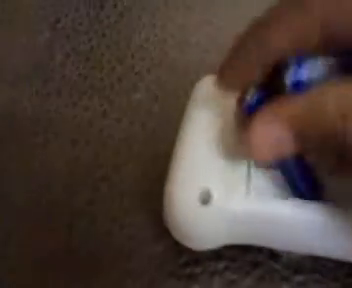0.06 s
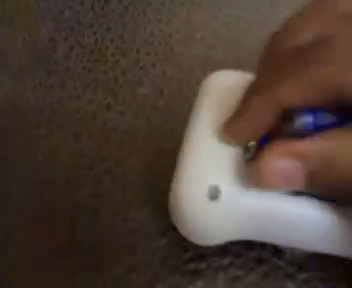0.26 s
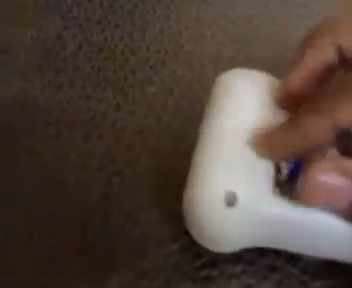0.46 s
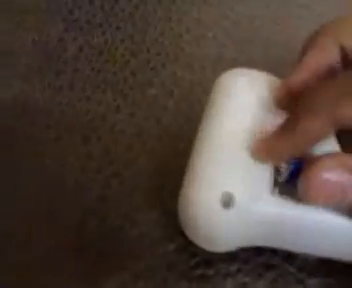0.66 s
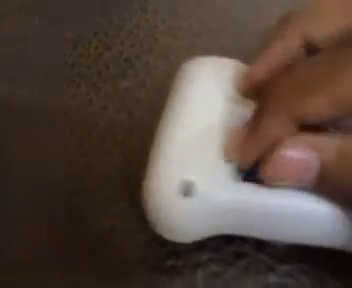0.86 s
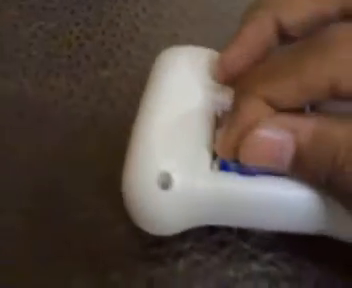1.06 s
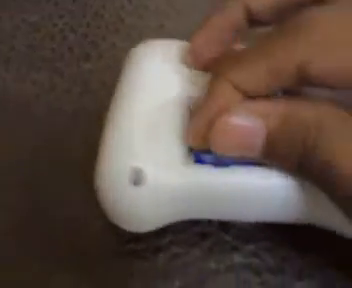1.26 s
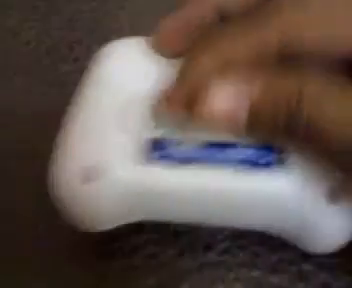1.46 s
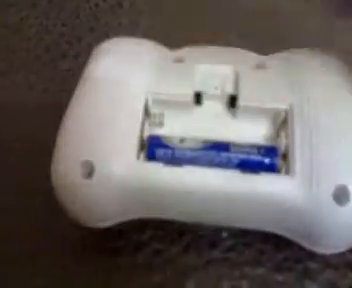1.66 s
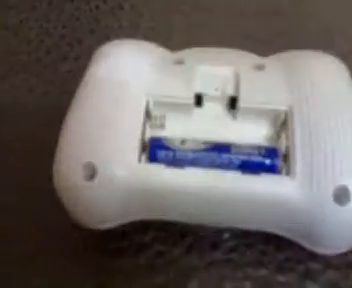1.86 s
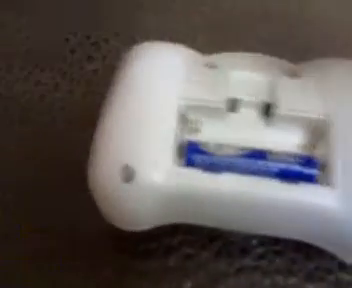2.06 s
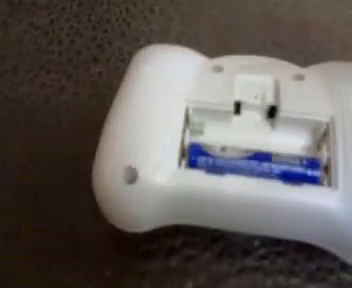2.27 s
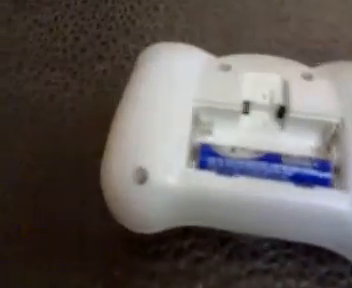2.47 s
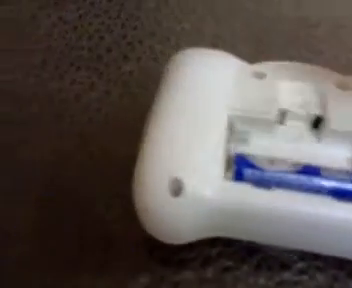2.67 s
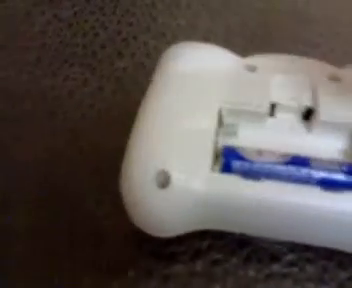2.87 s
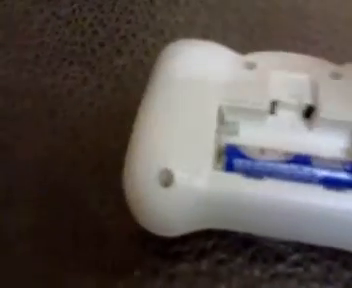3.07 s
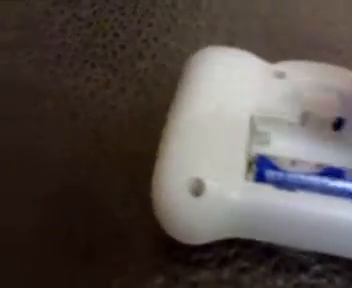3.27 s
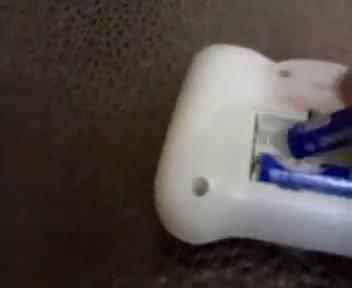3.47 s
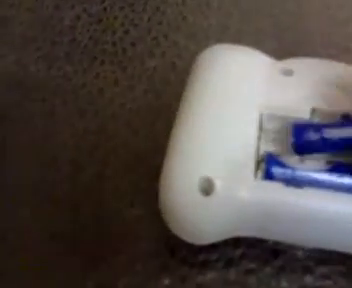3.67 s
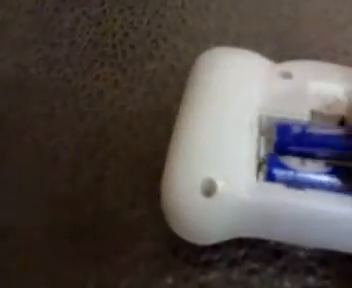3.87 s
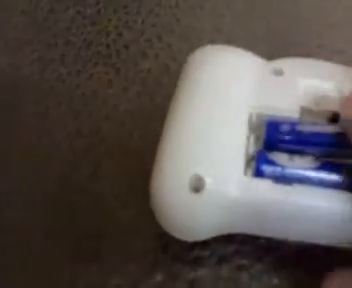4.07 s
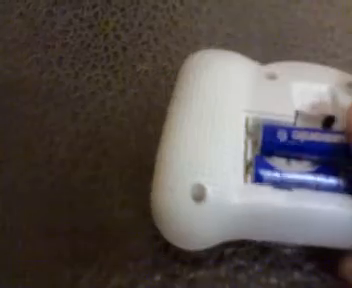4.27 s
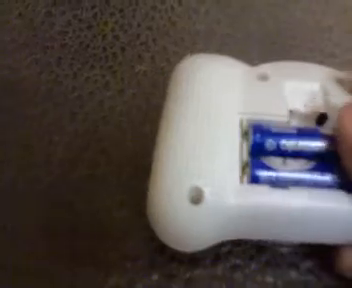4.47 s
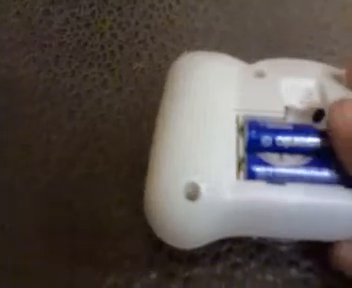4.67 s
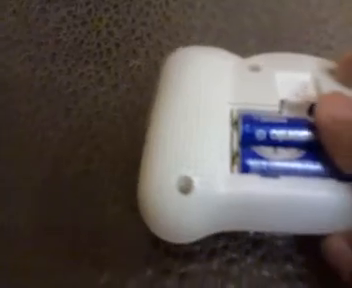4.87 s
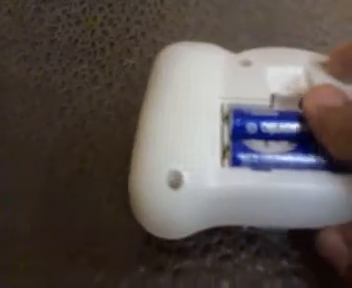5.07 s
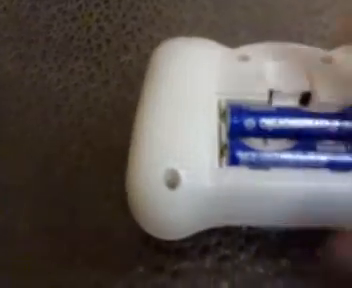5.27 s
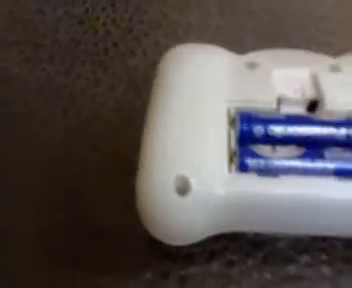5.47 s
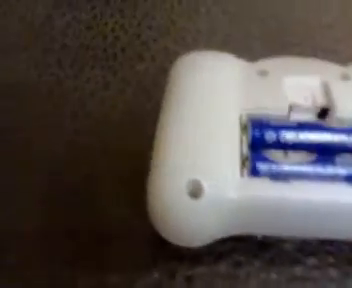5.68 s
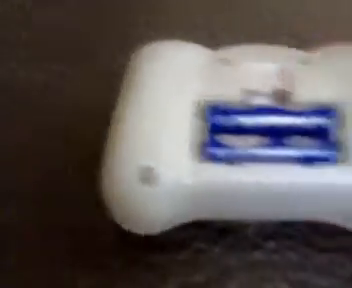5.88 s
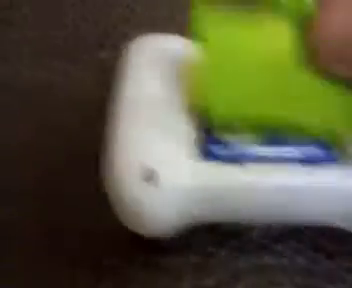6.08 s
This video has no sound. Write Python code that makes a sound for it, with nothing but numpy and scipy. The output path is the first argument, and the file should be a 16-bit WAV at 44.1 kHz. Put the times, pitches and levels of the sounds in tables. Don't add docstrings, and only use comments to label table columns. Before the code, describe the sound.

In a quiet room, two small cells are fitted into a light plastic shell on a table. Bright clattering knocks and crisp snaps come in two bursts, separated by about a second and a half of near silence. Springs buzz briefly, fingers scrape the plastic, and air and handling thump the close phone microphone. The hardest snaps clip and leave a short room echo.

```python
import sys
import numpy as np
from scipy import signal
from scipy.fft import rfft, irfft
from scipy.io import wavfile
from scipy.ndimage import uniform_filter1d

SR = 44100
rng = np.random.default_rng(int(sys.argv[2]) if len(sys.argv) > 2 else 0)


def elevation(decibels):
    levels = np.asarray(decibels, float)
    return 10 ** (levels / 20)


def master_out(mix):
    frames = np.transpose(np.atleast_2d(mix))
    ceiling = np.clip(frames, -1, 1)
    pcm = np.round(ceiling * 32767).astype(np.int16)
    wavfile.write(sys.argv[1], SR, pcm)


N = 269010
TIME = np.arange(N) / SR

# pitch in Hz, level in dB, t60 in seconds.
SHELL_MODES = [(670, -8, .012), (965, 0, .014), (1310, -3, .01), (1560, -2, .008), (1920, -1, .009),
               (2200, -9, .007), (2720, -5, .008)]
# pitch in Hz, level in dB, t60 in seconds.
RIB_MODES = [(3200, -8, .007), (3500, -5, .008), (3880, -1, .009), (4420, 0, .01), (5040, -2, .008),
             (5600, -4, .007), (6400, -6, .006)]


def unit(x):
    return x / np.sqrt(np.mean(x ** 2))


def peak(x, db):
    return x * elevation(db) / np.max(np.abs(x))


def band(x, lo_hz, hi_hz, order=2):
    return signal.sosfilt(signal.butter(order, [lo_hz, hi_hz], "bandpass", fs=SR, output="sos"), x)


def noise_band(lo_hz, hi_hz):
    return band(rng.standard_normal(N), lo_hz, hi_hz)


def walk(rate):
    hold = int(SR / rate)
    levels = np.repeat(rng.standard_normal(N // hold + 1), hold)
    return unit(uniform_filter1d(levels, hold)[:N])


def steady(x, span_s):
    return x / np.sqrt(uniform_filter1d(x ** 2, int(span_s * SR)) + 1e-18)


def fade(t, t60):
    return np.exp(-np.log(1000) * t / t60)


def swell(s, db, rise_s, fall_s):
    before = (s - TIME) / max(rise_s, .003)
    after = (TIME - s) / max(fall_s, .003)
    away = np.where(TIME < s, before, after)
    return elevation(2 * (db - 20 * np.minimum(away, 5)))


def add(out, x, s):
    i = int(s * SR)
    out[i:i + len(x)] += x[:N - i]


def ring(modes, focus_hz, focus_width, luck, push=np.ones(1)):
    hz, db, t60 = np.transpose(modes)[:, :, None]
    t = TIME[:2048]
    off_focus_db = np.minimum(3.1 * (np.log(hz / focus_hz) / focus_width) ** 2, 22)
    db = db - off_focus_db + 0.83 * luck[:len(hz), None]
    detune = luck[-len(hz):, None]
    hz = hz * (1 + 0.0096 * detune)

    def fed(t60):
        return signal.fftconvolve(fade(t, t60), push[None], axes=1)[:, :len(t)]

    own = 0.54 * np.sin(2 * np.pi * focus_hz * t) * fed(np.mean(t60, keepdims=True))[0]
    lag = (len(push) > 1) * np.pi * detune
    return own + np.sum(elevation(db) * np.sin(2 * np.pi * hz * t + lag) * fed(t60), axis=0)


def floor():
    # frequency in Hz, density in dB per Hz.
    hush_colour = [(59, -53.5), (100, -29.5), (193, -1), (317, -1.5), (434, -8.5), (484, -5), (936, -9),
                   (1430, -11), (2710, -16.5), (3510, -24), (4210, -26.5), (7170, -31.5), (8000, -50),
                   (10400, -86), (17600, -120)]
    hush_db, whine_db, whine_hz = -52.5, -69, 1450
    hz, db = np.transpose(hush_colour)
    bins_hz = np.arange(N // 2 + 1) * SR / N
    colour = elevation(np.interp(np.log(bins_hz + 1), np.log(hz), db))
    hush = unit(irfft(rfft(rng.standard_normal(N)) * colour, N))
    whine = np.sin(2 * np.pi * whine_hz * TIME)
    return hush * elevation(hush_db + 0.14 * walk(4.1)) + elevation(whine_db + 3.2 * walk(0.3)) * whine


def air():
    # strongest point in seconds, level in dB,
    # half length in seconds, flutter part in dB.
    gust_rows = [(0.0, -36, 0.049, -8), (0.13, -50, 0.23, 3.5), (0.429, -45, 0.13, 1),
                 (0.716, -32.5, 0.11, -14), (0.825, -41.5, 0.12, -4), (0.97, -39.5, .1, -8),
                 (1.056, -35, 0.25, -16), (1.23, -37.5, 0.057, -9), (1.483, -38, 0.14, -8.5),
                 (1.64, -44, 0.36, -23), (1.902, -46, 0.22, -27), (2.633, -38.5, 0.1, -15),
                 (2.871, -44.5, 0.089, -14), (3.03, -42.5, 0.11, -16), (3.145, -38.5, .12, -10.5),
                 (3.31, -40.5, 0.096, -10.5), (3.486, -36, 0.079, -23.5), (3.682, -31.5, 0.078, -10.5),
                 (3.831, -35, 0.09, -5.5), (4.503, -41, 0.097, 4), (4.631, -28.5, 0.071, -2.5),
                 (4.732, -21.5, 0.087, -11), (4.883, -40, 0.19, -18.5), (5.013, -38, 0.13, -27),
                 (5.273, -29, 0.1, -14), (5.449, -41.5, 0.18, -24), (5.558, -40, 0.11, -15.5),
                 (5.749, -51, 0.19, -9), (5.893, -44.5, 0.13, -24), (6.1, -30.5, 0.038, -20)]
    calm_db, calm_flutter_db, rumble_db = -68, -65.5, -58.5
    gusts = np.array([swell(s, db, half_s, half_s) for s, db, half_s, _ in gust_rows])
    flutter_shares = elevation(2 * np.array(gust_rows)[:, -1])
    lumps = steady(noise_band(20, 85), .09)
    flutter = steady(elevation(3.8 * walk(25)) * noise_band(120, 230), .09)
    rumble = unit(noise_band(36, 40))
    lump_power = gusts.sum(axis=0) + elevation(2 * calm_db)
    flutter_power = flutter_shares @ gusts + elevation(2 * calm_flutter_db)
    return np.sqrt(lump_power) * lumps + elevation(rumble_db) * rumble + np.sqrt(flutter_power) * flutter


def scuff():
    # hardest point in seconds, level in dB, rise in seconds, fall in seconds
    # (each spans 20 dB), dull part in dB.
    stroke_rows = [(.001, -35.5, 0.011, 0.025, -4.5), (.05, -48.5, 0.088, 0.088, -2.5),
                   (.27, -49, 0.15, 0.17, -4.5), (0.527, -59, 0.12, 0.3, -9), (.74, -53, .2, 0.092, -11.5),
                   (.98, -59.5, .15, 0.38, -7.5), (1.432, -36.5, 0.02, 0.022, -8),
                   (1.5, -51.5, 0.07, 0.057, 4.5), (2.15, -61, 0.018, 0.071, -17),
                   (2.285, -70, .06, 0.095, -17), (2.53, -63, 0.1, 0.16, -13),
                   (3.378, -51.5, .01, 0.024, 0), (3.405, -40.5, 0.011, 0.055, -2),
                   (3.556, -42, 0.057, 0.032, -3), (3.6, -59.5, 0.11, 0.15, 1),
                   (3.47, -55.5, 0.16, 0.18, -2.5), (3.697, -39.5, 0.046, 0.011, -3),
                   (5.092, -61, .025, 0.028, 1), (5.222, -54, 0.056, 0.039, -1),
                   (5.582, -45.5, 0.033, 0.018, -19.5), (5.735, -50.5, 0.052, 0.049, -7.5),
                   (5.65, -59.5, .08, 0.088, -12)]
    focus_hz, focus_width, skirt_db, lump_db = 4485, .17, 10, 3.6
    strength = elevation(2.2 * np.minimum(rng.exponential(size=N), 4))
    slips = rng.standard_normal(N) * strength * (rng.random(N) < .2)
    strokes = np.array([swell(*row[:-1]) for row in stroke_rows])
    dull = elevation(2 * np.array(stroke_rows)[:, -1]) @ strokes
    ribs = np.zeros(N)
    for hz, db, _ in RIB_MODES:
        off_focus_db = min(4.0 * (np.log(hz / focus_hz) / focus_width) ** 2, skirt_db)
        ribs += elevation(db - off_focus_db) * unit(band(slips, hz * .91, hz * 1.1))
    shell = sum(elevation(db) * band(slips, hz * 0.99, hz * 1.09) for hz, db, _ in SHELL_MODES)
    return elevation(lump_db * walk(70)) * (np.sqrt(strokes.sum(axis=0)) * unit(ribs) + np.sqrt(dull) * unit(shell))


def room(x):
    # centre in Hz, level in dB, t60 in seconds.
    reverb_bands = [(510, -35.5, 0.29), (796, -27.5, 0.48), (1500, -31, 0.48), (2210, -21.5, 0.3),
                    (3560, -28.5, 0.33), (4700, -26, 0.25), (6200, -33.5, 0.058)]
    rise_s, late_db, late_stretch = 0.012, -18.5, 2.98
    t = TIME[:SR]
    tail = np.zeros(len(t))
    for hz, db, t60 in reverb_bands:
        hiss = unit(band(rng.standard_normal(len(t)), hz / 1.3, hz * 1.26))
        decay = fade(t, t60) + elevation(late_db) * fade(t, t60 * late_stretch)
        tail += elevation(db) * hiss * decay
    build_up = 1 - np.exp(-(t / rise_s) ** 3)
    return signal.fftconvolve(x, tail * build_up * elevation(-22.5))[:N]


def ticks():
    # start in seconds, peak in dB, ring pitch in Hz, ring t60 in seconds.
    tick_rows = [(0.0276, -30.5, 4750, 0.029), (0.036, -31.5, 4740, 0.015), (2.144, -54, 4200, 0.0093),
                 (3.377, -26, 4510, 0.028), (3.3781, -36, 4000, 0.018), (3.591, -41, 5500, 0.006),
                 (3.592, -45, 3830, 0.0075), (3.602, -48, 3800, .01), (3.692, -30.5, 4700, 0.027),
                 (3.697, -29, 4250, 0.02), (4.1208, -38, 4650, 0.037), (4.1422, -44, 4330, 0.015),
                 (4.191, -54, 3980, 0.01), (4.2387, -35.5, 4250, 0.013), (5.167, -49, 4380, 0.0078),
                 (5.204, -43, 4940, 0.017), (5.2215, -40, 4960, 0.012), (5.266, -51, 3850, 0.0081),
                 (5.5372, -45, 4930, 0.012), (5.554, -37, 5200, 0.015), (5.5744, -39, 3930, 0.015),
                 (5.714, -46, 3800, 0.012), (5.735, -42, 4000, .015), (5.744, -41, 3880, 0.014),
                 (0.7718, -5, 3820, 0.011), (.7725, -17, 5100, 0.0096), (.787, -26, 3900, 0.0088),
                 (0.912, -12.5, 3916, 0.0089), (0.912, -13.5, 6000, 0.013), (3.825, -18, 5780, 0.022),
                 (3.7133, -19.5, 4350, 0.012), (4.485, -10, 4450, .02), (4.489, -17, 5040, 0.015),
                 (.42, -15.5, 4330, .015), (.437, -29, 4400, .01)]
    out = np.zeros(N)
    push = np.minimum(TIME[:2048] / .0012, 1)
    for s, db, hz, t60 in tick_rows:
        modes = [(mode_hz, mode_db, max(t60, .002)) for mode_hz, mode_db, _ in RIB_MODES]
        add(out, peak(push * ring(modes, hz, .09, rng.standard_normal(14)), db), s)
    return band(out, 2600, 6500, order=3)


def rattle(x):
    t = TIME[:SR // 8]
    grains = rng.standard_normal(len(t)) ** 3 * fade(t, 0.059)
    return signal.fftconvolve(x, elevation(-47.5) * grains)[:N]


def knocks():
    # start in seconds, peak in dB, shell
    # ring in Hz, bright part in dB, chatter in ms.
    knock_rows = [(0.067, -21.5, 965, -20.5, 1.9), (0.0732, -15, 965, -13.5, 1.7),
                  (0.079, -22.5, 890, -11, 1.9), (0.2465, -30.5, 1220, -28, 1.1),
                  (0.25, -19.5, 1030, -24, 2.7), (0.256, -22, 1010, -27, 2), (0.278, -27, 1900, -22, 1.6),
                  (.281, -28, 1357, -20.5, 1.9), (4.674, -28.5, 1500, -9, 1.9),
                  (4.678, -29.5, 1300, -12.5, 2.5), (0.863, -36, 1000, -3, 2.1),
                  (0.882, -34, 945, -13, 5.4), (1.008, -36.5, 1030, -21, 4.8),
                  (1.419, -34.5, 1044, -14, 2.2), (1.426, -39.5, 1400, 7, 1.8), (1.475, -46, 1802, -7, 2),
                  (3.363, -29.5, 705, -19, 1.4), (3.481, -39, 875, -11, 2.3), (3.41, -31.5, 1320, -15, 2.2),
                  (3.414, -29.5, 1350, -4.5, 2.06), (3.408, -26, 746, -5.5, 3.8),
                  (3.545, -41, 1700, -11, 3.5), (3.558, -33.5, 1610, -10.5, 3.3),
                  (3.564, -36.5, 960, -15, 3), (3.6895, -24, 967, -22, 1.4), (3.697, -27, 1300, -14, 2.7),
                  (3.707, -29, 1570, -16, 5.6), (3.7172, -18, 1693, -7, 2.4),
                  (3.72, -29.5, 1400, -0.5, 1.7), (3.723, -30.5, 1500, -17, 1.1),
                  (3.404, -22, 1335, -10, 1.4), (3.551, -36, 1560, -3.5, 3.1), (3.6855, -16, 900, -20, 1.8),
                  (4.403, -34, 946, -14.5, 0.78),
                  (0.4182, 0.5, 1880, -6, 2.3), (0.4205, -14.5, 1010, 0, 2.9), (0.428, -4.5, 1810, -15, 1.9),
                 (0.4293, -13.5, 1000, -16.5, 2.1), (0.436, -22.5, 1890, 4, 1.2),
                 (.463, -22, 1010, -19, 1.7), (0.4401, -23, 2210, -16, 2), (0.463, -19, 2100, -14.5, 2.9),
                 (0.7691, -1, 1930, -2.5, 2), (0.7712, -8, 1970, -7, 1.8), (0.787, -8.5, 1360, -16, 0.67),
                 (0.792, -18, 1500, -15.5, 1.7), (0.797, -21, 2020, -12.5, 2.3),
                 (0.9122, -2, 1770, -14, 2.6), (.917, -23, 1920, -19, 2), (3.7135, -10, 1710, -7, 1.9),
                 (3.8247, -10.5, 1500, -8, 2), (3.828, -23, 1310, -3, 2.4), (3.8348, -23, 1220, -8.5, 2),
                 (3.8759, -9.5, 1440, -12.5, 2.34), (3.881, -23.5, 1500, -7, 1.9),
                 (4.475, -6.5, 990, -20, 1.7), (4.4767, 2, 1050, -9, 3), (4.482, -4.5, 1590, -8.5, 1.4),
                 (4.4847, 1.5, 1280, -8.5, 0.83), (4.4844, -11, 1790, 6, 4.7),
                 (4.669, -16, 1390, -17.5, 2.6)]
    rib_focus_hz, rough = 4250, .55
    out = np.zeros(N)
    t = TIME[:512]
    for s, db, low_hz, bright_db, chatter_ms in knock_rows:
        shell_luck, rib_luck = rng.standard_normal((2, 14))
        grit = rng.standard_normal((2, 32))
        hard = np.clip(1 + db / 30, .15, 1)
        span_s = .001 * np.clip(chatter_ms, .3, 8)
        chatter = (np.exp(-t / 0.00019) * 3.4 * hard ** 2 + 1) * np.exp(-(t / span_s) ** 4)
        shell_push, rib_push = chatter * np.exp(rough * np.repeat(grit, 16, axis=1))
        shell = band(ring(SHELL_MODES, low_hz, .6 * hard, shell_luck, shell_push), 300, 2900)
        ribs = band(ring(RIB_MODES, rib_focus_hz, .3, rib_luck, rib_push), 2900, 8000)
        add(out, peak(shell, db) + peak(ribs, db + bright_db + 5.0), s)
    return band(out, 560, 11000, order=4)


def thuds():
    # start in seconds, peak in dB.
    thud_rows = [(.074, -28), (.42, -22), (0.772, -28.5), (.914, -20), (3.823, -35), (4.479, -8),
                 (4.486, -17.5)]
    hz = 390
    push = band(signal.unit_impulse(1024), hz / 1.7, hz * 1.6)
    out = np.zeros(N)
    for s, db in thud_rows:
        add(out, peak(push, db), s)
    return out


def throws():
    # start in seconds, strength in dB, centre in Hz.
    throw_rows = [(0.075, -30, 990), (0.253, -29, 1500), (.42, -3.5, 2110), (.771, -8.5, 2010),
                  (.914, -12.5, 1900), (3.405, -38, 1600), (3.712, -18, 2000), (3.825, -8, 2400),
                  (3.877, -20, 2223), (4.482, 3.5, 2480), (4.671, -24.5, 1800)]
    crack_spread, bay_spread = 2.4, 1.5
    out = np.zeros(N)
    pulse = signal.unit_impulse(512)
    for s, db, hz in throw_rows:
        crack = band(pulse, hz / crack_spread, hz * crack_spread, order=1)
        bay = band(pulse, hz / bay_spread, hz * bay_spread, order=1)
        add(out, peak(crack, db + 11.0) + peak(bay, db - 12.5), s)
    return out


def clicks():
    # start in seconds, peak in dB, centre in Hz.
    click_rows = [(.1085, -44, 2600), (0.2273, -34, 3400), (0.355, -28.5, 2903), (0.573, -27, 2960),
                  (0.613, -32, 2787), (0.663, -30, 2670), (0.7272, -28, 3180), (1.1874, -41, 6000),
                  (1.2505, -39, 5200), (1.301, -45, 4280), (1.396, -36, 5317), (1.41, -38, 5070),
                  (1.945, -32, 5486), (1.945, -57, 2460), (1.2505, -39, 1990), (.848, -31, 2500),
                  (2.959, -45, 4614), (4.0652, -33, 5160), (4.2787, -34.5, 6200), (4.3827, -44, 5000),
                  (3.816, -28, 1500), (1.57, -40, 6000), (5.538, -33, 6000), (5.546, -37, 5540),
                  (5.557, -31, 6200), (5.72, -37, 5800), (5.747, -37, 5880)]
    out = np.zeros(N)
    for s, db, hz in click_rows:
        add(out, peak(band(signal.unit_impulse(128), hz / 1.4, hz * 1.35, order=3), db), s)
    return out


def partials():
    # strongest point in seconds, level in dB, pitch in Hz, seconds to fall 20 dB.
    partial_rows = [(4.508, -30, 2620, .1), (4.575, -44, 2618, .12), (4.505, -37, 2460, .05),
                    (4.505, -35, 2096, .07), (4.51, -36, 2740, .1), (4.5, -40, 4200, .06),
                    (.48, -42, 960, .03), (.235, -63, 3950, .5), (.52, -60, 4500, .4),
                    (4.85, -69, 1449, 13)]
    out = np.zeros(N)
    for s, db, hz, fall_s in partial_rows:
        level = np.sqrt(2 * swell(s, db, .012, fall_s)) * elevation(3 * walk(90))
        out += level * np.sin(2 * np.pi * hz * TIME)
    return out


def springs():
    # strongest point in seconds, level in dB, pitch in Hz, seconds to fall 20 dB.
    spring_rows = [(.24, -60, 3968, 0.5), (.44, -50.5, 4360, 0.14), (.7, -53.5, 4250, 0.1),
                   (.8, -44, 4300, 0), (.94, -52, 4070, 0.2), (.94, -38.5, 1896, -0.12),
                   (4.5, -28.5, 2580, 0.037), (4.55, -55.5, 2648, 0.33)]
    spread = 1.04
    out = np.zeros(N)
    for s, db, hz, fall_s in spring_rows:
        buzz = unit(noise_band(hz / spread, hz * spread))
        out += np.sqrt(swell(s, db, .012, fall_s)) * buzz
    return out


def shoves():
    # start in seconds, peak in dB, pitch in Hz.
    shove_rows = [(0.565, -49, 61.9), (0.665, -35, 94.2), (0.762, -29.5, 109.6), (0.904, -28, 153),
                  (0.994, -27, 85), (1.045, -22, 104), (1.103, -34, 75.4), (1.215, -28, 91.5),
                  (1.449, -34.5, 108), (1.571, -32.5, 70.0), (2.594, -41, 70.0), (3.066, -28, 81.4),
                  (3.143, -26, 100.2), (3.258, -39, 72.5), (3.467, -35, 61.6), (3.666, -37, 61.6),
                  (3.778, -28, 96.9), (4.608, -26.5, 70.0), (4.706, -21, 102.1), (4.842, -26, 61.2),
                  (5.255, -38, 61.8), (5.315, -34.5, 61.6), (5.402, -44, 78), (5.533, -41, 62.6),
                  (5.852, -42, 94.6)]
    cycles = 0.61
    out = np.zeros(N)
    for s, db, hz in shove_rows:
        turns = TIME[:4096] * hz
        push = np.sin(2 * np.pi * turns) * turns * np.exp(-2 * turns / cycles)
        add(out, peak(push, db - 0.5), s)
    return out


def scene():
    contacts = knocks() + ticks() + clicks()
    port_hz = 6000
    near = band(contacts + rattle(contacts) + scuff(), 160, port_hz)
    sent_to_room = elevation(-13) * band(near, 1300, 7000, order=1) + throws()
    handset = near + thuds() + springs() + partials()
    return (handset + room(sent_to_room) + air() + floor() + shoves())[None]


def roll_off(x):
    return signal.sosfilt(signal.butter(12, 16530, fs=SR, output="sos"), x)


def record(dry):
    ceiling, offset = .71, -.015
    smear_db, smear_s = -55.5, 0.01
    overload_top_db, edge_db, edge_gate = -12, 2, .2
    x = signal.sosfilt(signal.ellip(10, .5, 80, 7400, fs=SR, output="sos"), dry[0])
    ahead = rng.standard_normal(1024) * (TIME[:1024] < smear_s)
    hiss = signal.fftconvolve(band(x, 400, 13000)[::-1], ahead)[:N][::-1]
    x = x + elevation(smear_db) * hiss
    attack = np.clip(uniform_filter1d(np.abs(x), 256) * 4 / edge_gate - 1, 0, 1)
    x = np.clip(x, -ceiling, ceiling)
    narrow = signal.sosfiltfilt(signal.ellip(8, .1, 40, 7550, fs=SR, output="sos"), x)
    edge = elevation(edge_db) * band(uniform_filter1d(attack, 128) * dry[0], 7400, 8700, order=4)
    x = narrow + elevation(overload_top_db) * (x - narrow) + edge
    x = np.clip(x, -1.04 * ceiling, 1.04 * ceiling)
    x = signal.sosfilt(signal.ellip(8, .1, 50, 16300, fs=SR, output="sos"), x)
    return roll_off(x[None] + offset)


dry = scene()
out = record(dry)
master_out(out)
```